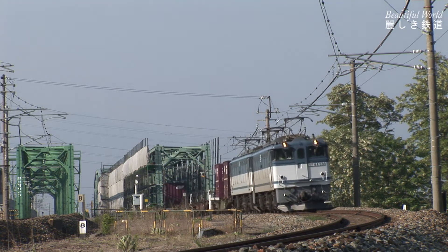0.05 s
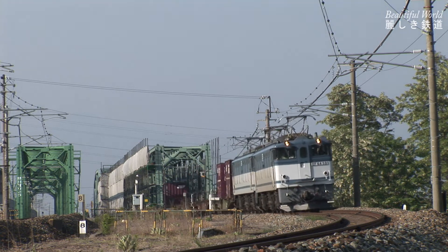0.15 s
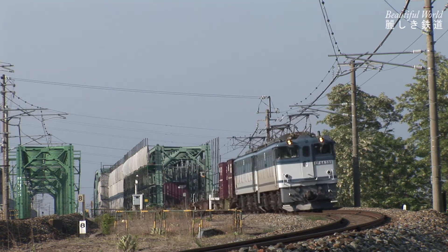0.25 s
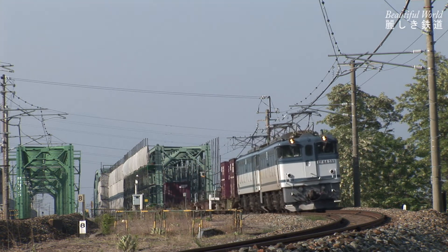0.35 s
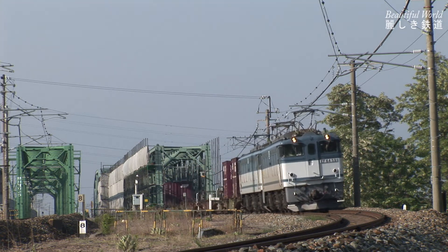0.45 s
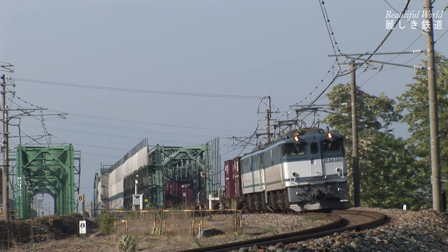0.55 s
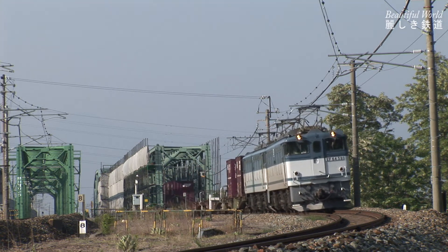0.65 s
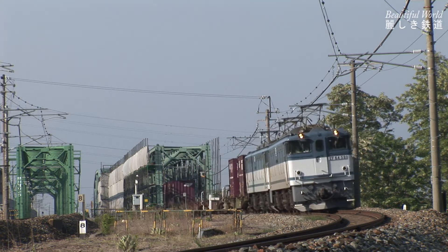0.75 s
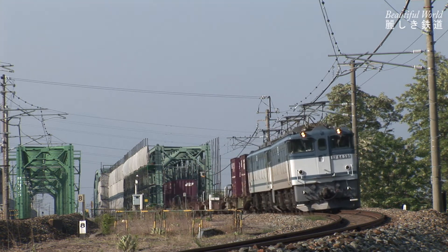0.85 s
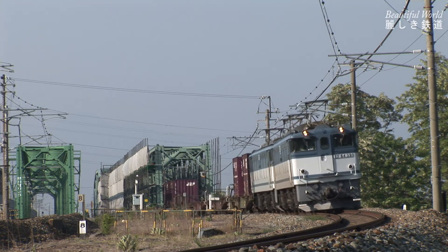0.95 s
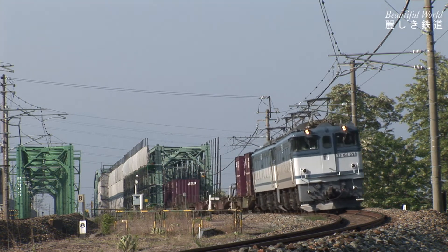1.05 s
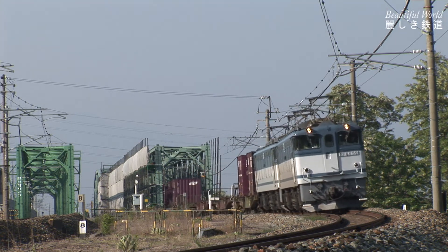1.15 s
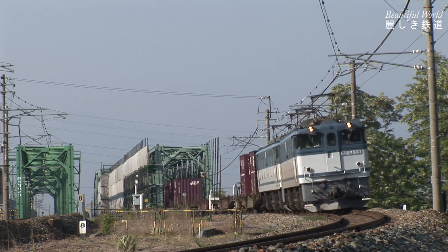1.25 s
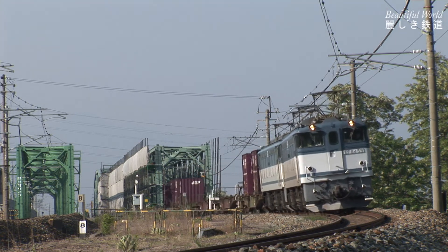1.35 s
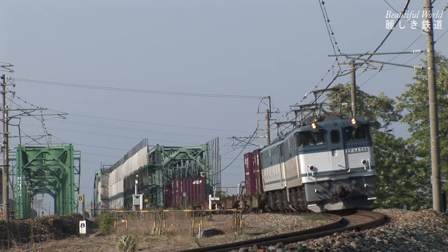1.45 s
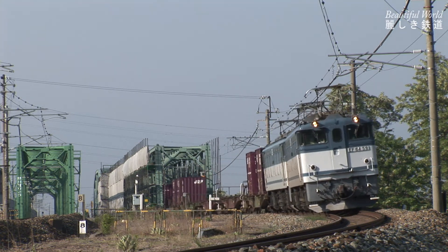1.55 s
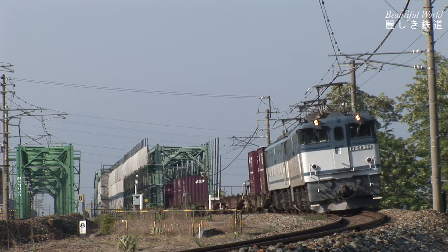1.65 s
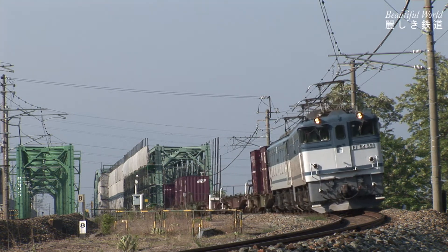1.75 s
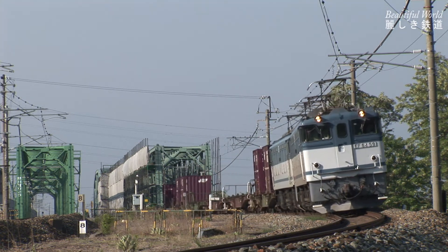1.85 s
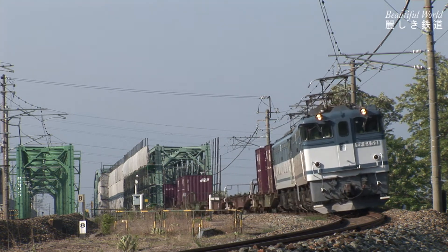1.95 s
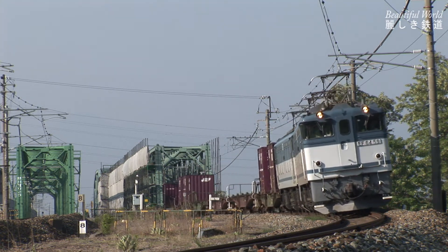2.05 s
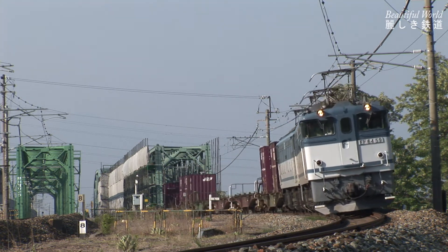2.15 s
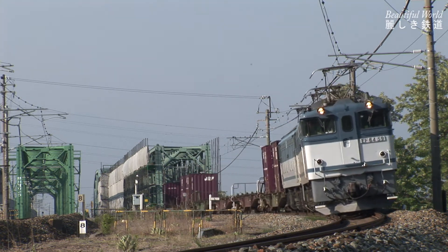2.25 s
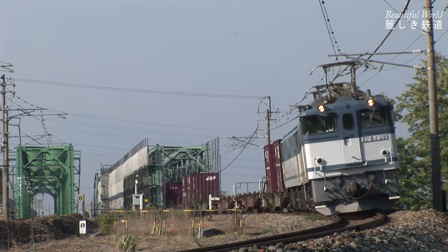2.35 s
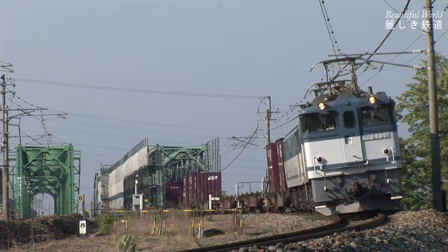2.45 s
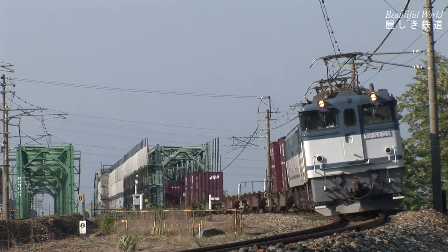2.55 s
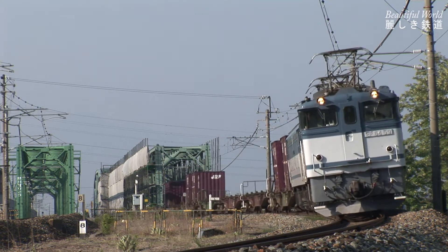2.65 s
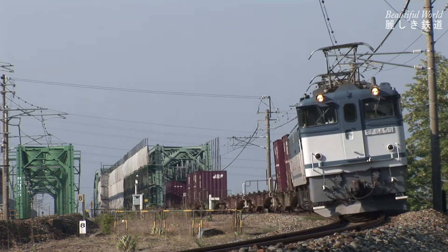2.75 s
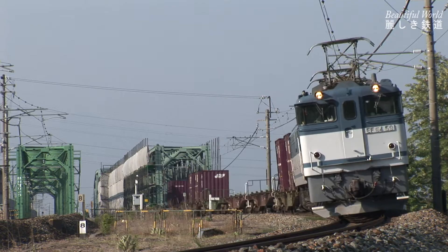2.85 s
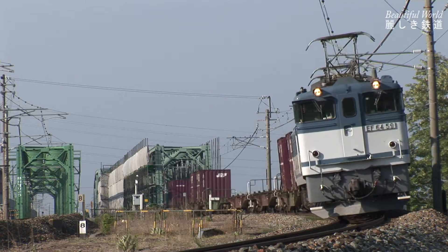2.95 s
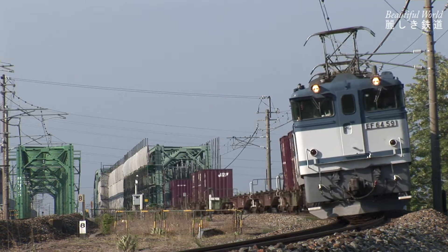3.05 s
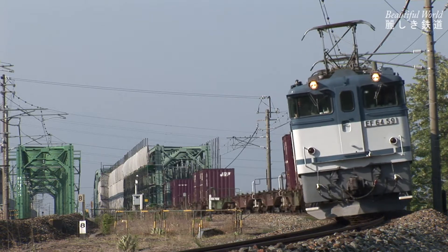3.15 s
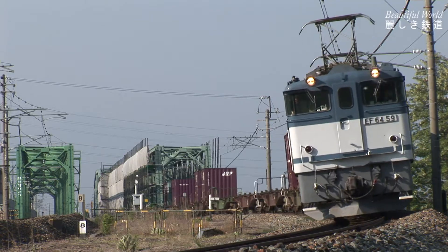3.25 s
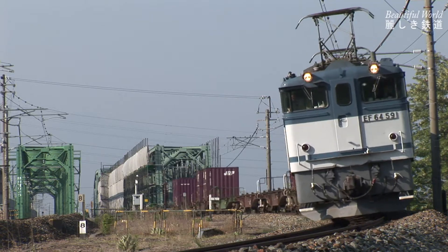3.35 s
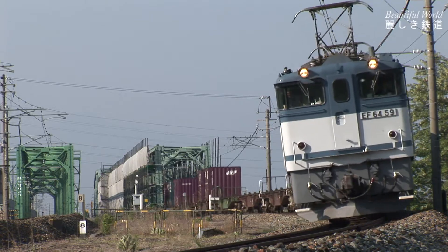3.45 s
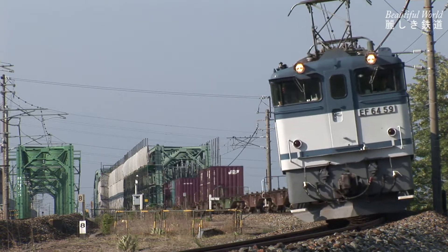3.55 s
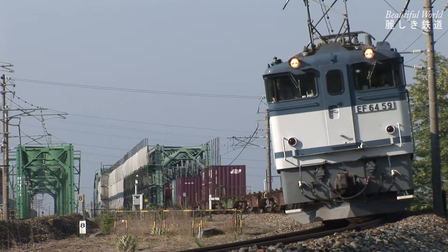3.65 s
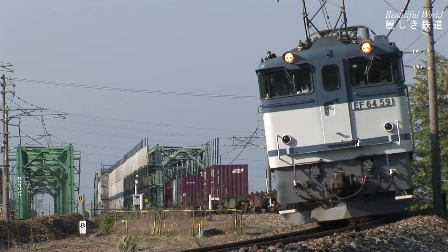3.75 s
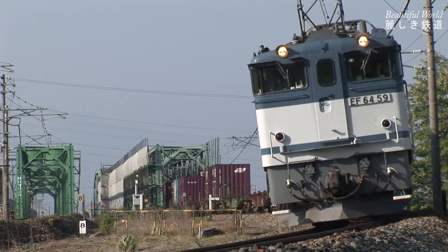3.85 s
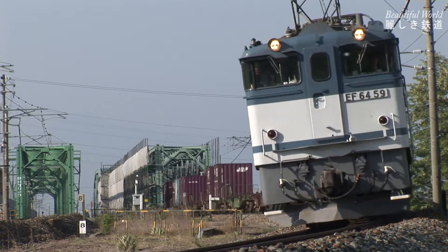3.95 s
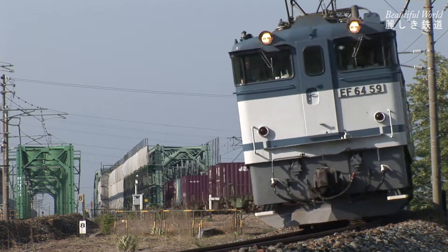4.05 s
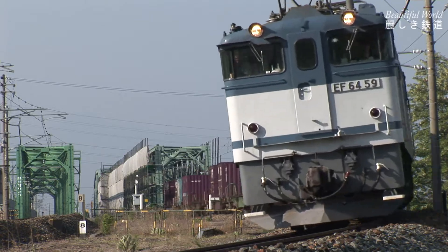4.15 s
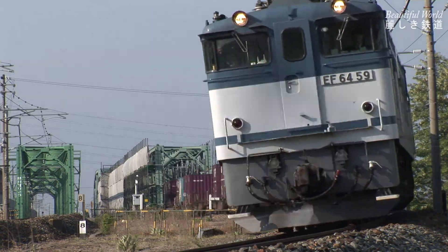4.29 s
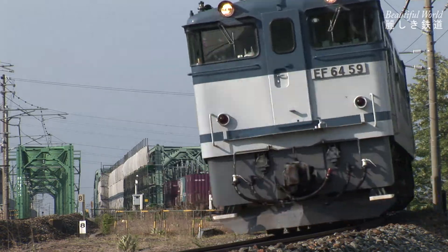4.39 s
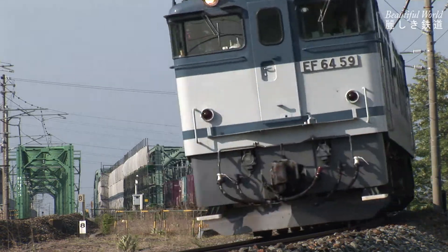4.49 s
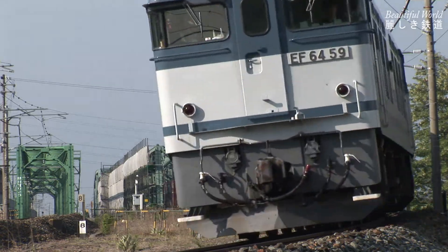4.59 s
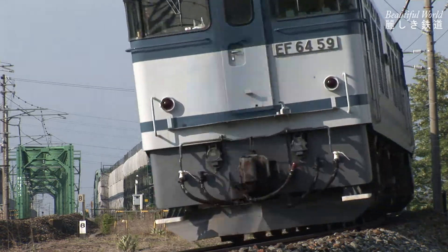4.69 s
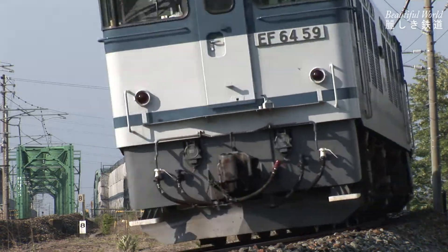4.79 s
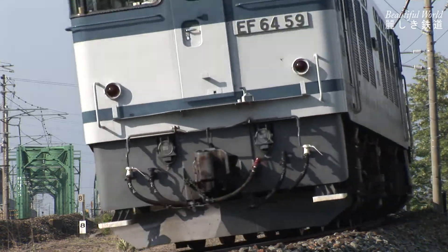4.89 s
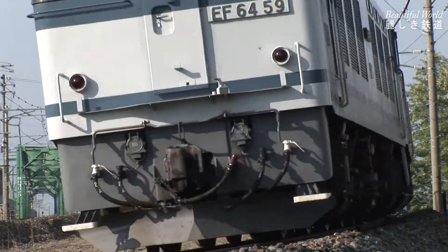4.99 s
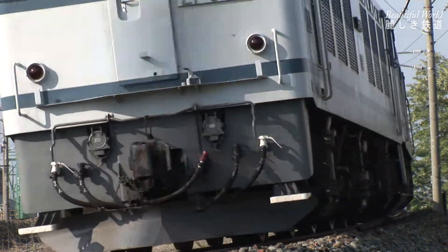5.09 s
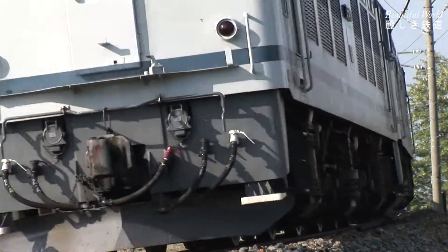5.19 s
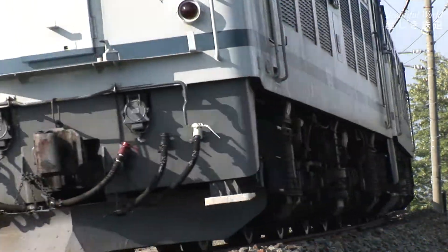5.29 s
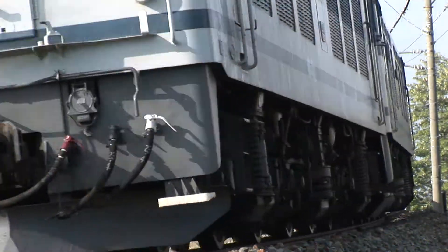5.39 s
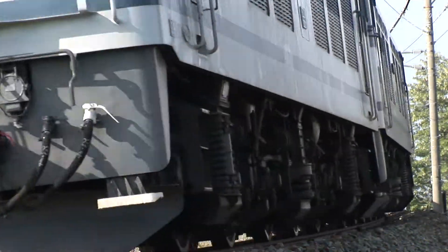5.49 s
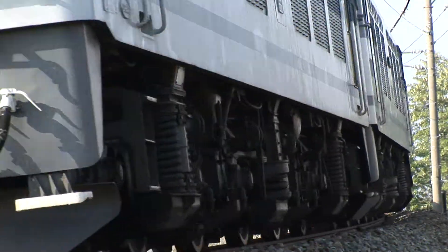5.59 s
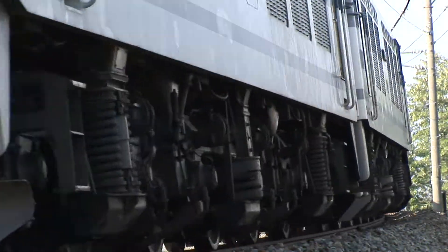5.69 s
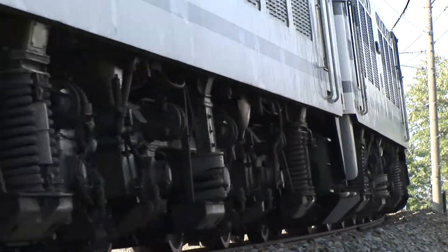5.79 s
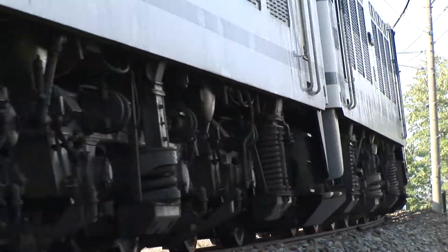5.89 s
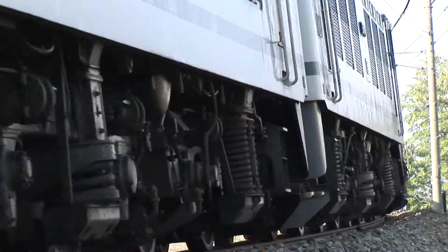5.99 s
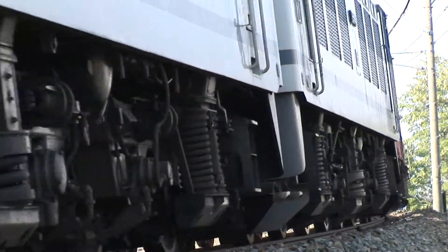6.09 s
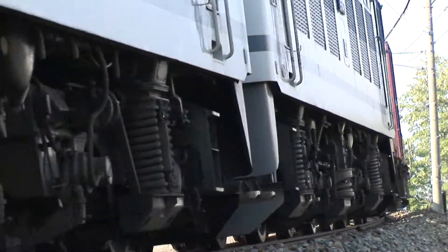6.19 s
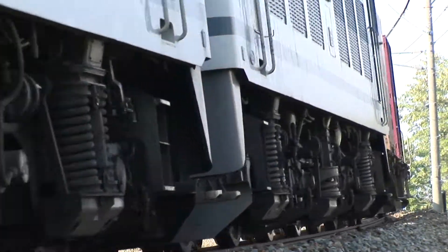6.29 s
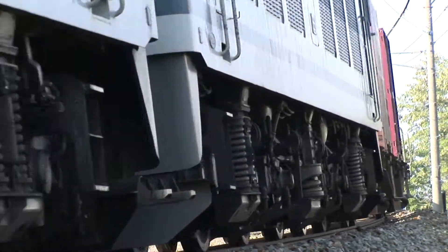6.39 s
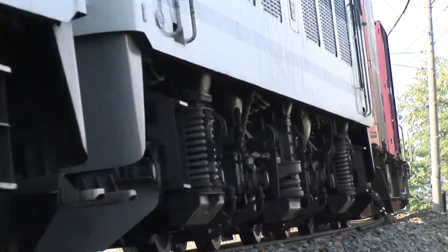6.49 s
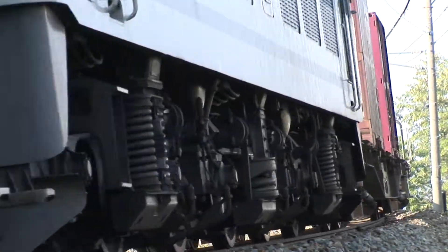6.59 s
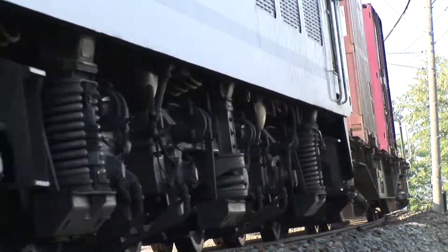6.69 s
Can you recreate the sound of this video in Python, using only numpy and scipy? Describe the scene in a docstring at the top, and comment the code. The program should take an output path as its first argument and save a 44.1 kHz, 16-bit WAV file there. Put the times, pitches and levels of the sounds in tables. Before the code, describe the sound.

Beside a railway curve outdoors, a freight train comes off a steel bridge. A low, soft roar and murmuring girder hum lie under a few short bird chirps. Motor hum and a thin high whine grow as the locomotive nears. Near the end it arrives abruptly: metallic clanks, thuds, booming bodies and bright hiss, very loud, heard in wide stereo from right beside the rails.

```python
"""Freight train coming off a bridge

An electric locomotive pulls freight wagons off a steel bridge and round a curve towards two microphones
beside the track. The far roar, shaped noise, swells slowly over a humming girder and motors; birds chirp as
gliding tones and a thin whine grows. Then wheels clank past as ringing tones with a crack and a thud,
the roar jumps, bodies boom and a bright hiss sets in."""
import sys
import numpy as np
from scipy import signal
from scipy.fft import rfft, irfft, next_fast_len
from scipy.io import wavfile
from scipy.ndimage import uniform_filter1d

SR = 44100
rng = np.random.default_rng(int(sys.argv[2]) if len(sys.argv) > 2 else 0)


def generate_wav(signal):
    """Clip the signal to [-1, 1] and save it as 16-bit WAV at the path in sys.argv[1]."""
    frames = np.transpose(np.atleast_2d(signal))
    scaled = np.clip(frames, -1, 1) * 32767
    pcm = np.round(scaled).astype(np.int16)
    wavfile.write(sys.argv[1], SR, pcm)


N = 296793
T = np.arange(N) / SR  # time in seconds

# the locomotive keeps a steady speed; the near sounds begin before it is abreast
SPEED_M_S, ABREAST_S, TRACK_M = 11.38, 6.528, 2.93
ARRIVE_S = 5.893

# clanks, clicks and trailing rattle of the passing wheels:
# [start_s, ring_level_db, thud_level_db, rattle_change_db]
CLANKS = [(5.889, -21, -25, 2.5), (5.908, -26, -14, 4.5), (5.913, -28, -23, -4.5), (6.04, -24.5, -33, 1.5),
          (6.056, -33, -26, 4), (6.074, -40, -33, 1), (6.094, -41, -22, -6.5), (6.385, -22, -8, 0),
          (6.498, -22.5, -26, -1), (6.56, -29, -23, 2.5)]

# Two-row sounds hold the sum and the difference of the microphones: left = sum + difference,
# right = sum - difference.


def undb(db):
    """Turn decibels into a plain gain."""
    return 10 ** (np.asarray(db) / 20)


def on_log(hz, table, column=1):
    """Read a table column on a logarithmic frequency axis."""
    table = np.array(table, float)
    return np.interp(np.log(hz + 1), np.log(table[:, 0]), table[:, column])


def walk(rate, n):
    """Random levels held for 1 / rate seconds and smoothed twice; spread near 1."""
    hold = int(SR / rate)
    steps = np.repeat(rng.standard_normal(n // hold + 1), hold)
    return 1.62 * uniform_filter1d(uniform_filter1d(steps, hold), hold)[:n]


def rise(start_s, length_s):
    """A ramp from 0 to 1."""
    return np.clip((T - start_s) / length_s, 0, 1)


def level(table):
    """Gain curve of a table of times (s) and levels (dB)."""
    return undb(np.interp(T, *np.transpose(table)))


def bump(center_s, half_s):
    """A smooth bell-shaped swell in time, 1 at its centre."""
    return np.exp(-((T - center_s) / half_s) ** 2)


def distance():
    """Metres to the locomotive on a straight line that passes TRACK_M away."""
    return np.hypot(SPEED_M_S * (ABREAST_S - T), TRACK_M)


def shaped(hz, modes):
    """Gain over frequency of a row of peaks or notches, multiplied together."""
    return np.prod([1 + (undb(db) - 1) / (1 + (2 * (hz - f) / w) ** 2) for f, w, db in modes], axis=0)


def murmur(hz, width_hz):
    """A narrow band of noise around a pitch curve, rms near 1."""
    phase = 2 * np.pi * np.cumsum(hz + 0 * T) / SR
    return walk(width_hz, N) * np.sin(phase) + walk(width_hz, N) * np.cos(phase)


def responses(hz, total, diff, diff_db, link, rings):
    """Gains to sum and difference (rows) from two unrelated noises (columns)."""
    # notches and a ridge in the sum, notches in the difference: [pitch_hz, width_hz, change_db]
    sum_notches = [(4436, 530, -8.5), (4950, 210, 5), (7340, 1550, -13)]
    diff_notches = [(2960, 890, -10.5), (5140, 390, -10), (7100, 440, -14), (10900, 1800, -17)]
    lift = shaped(hz, rings)
    mid = lift * shaped(hz, sum_notches) * undb(on_log(hz, total))
    side = lift * shaped(hz, diff_notches) * undb(on_log(hz, diff) + diff_db)
    share = np.clip(on_log(hz, link), 0, 1)
    turn = np.exp(1j * on_log(hz, link, column=2))
    # the shared part of the difference follows the sum, the rest is its own noise
    return np.array([[mid, 0 * mid], [side * share * turn, side * np.sqrt(1 - share ** 2)]])


def roar(start, gains, colour, swell_db, own_db, grit_db):
    """Noise in bands of about 0.7 octave: parts follow their levels, bands waver, the treble is gritty."""
    # overlapping parts: rumble of bridge and ground, drone of the bodies, rails, wheels, treble hiss
    # [fade_in_from_hz, full_from_hz, full_to_hz, gone_at_hz]
    parts = [(18, 20, 90, 240), (90, 240, 440, 500), (440, 500, 1200, 1600), (1200, 1600, 4200, 7600),
             (4200, 7600, 16800, 17000)]
    length = N - start
    n = next_fast_len(length)
    hz = np.arange(n // 2 + 1) * SR / n
    mix = responses(hz, *colour)
    heard = np.einsum("cif,if->cf", mix, rfft(rng.standard_normal((2, n))))
    weights = [np.interp(hz, part, [0, 1, 1, 0]) for part in parts]
    # even out each part, so that its gain alone sets its level in the sum
    part_rms = [np.sqrt(2 * np.sum(np.abs(w * mix[0, 0]) ** 2) / n) for w in weights]
    gains = [gain[start:] / rms for gain, rms in zip(gains, part_rms)]
    out = np.zeros((2, length))
    swell, grit = walk(5, length), walk(70, length)
    edges = np.geomspace(18, 17000, 15)
    for lo, hi in zip(edges, edges[1:]):
        band = (hz >= lo) & (hz < hi)
        treble = min(lo / 2500, 1.5)  # high bands flicker most
        db = treble * (swell_db * swell + grit_db * grit) + own_db * walk(9, length)
        for weight, gain in zip(weights, gains):
            if weight[band].any():
                out += undb(db) * gain * irfft(heard * band * weight, n)[:, :length]
    return np.pad(out, ((0, 0), (start, 0)))


def far_levels():
    """Steady bridge plus a locomotive that grows as 1 / distance until it arrives; air eats the treble."""
    # rumble, drone, rails, wheels before the swells: wagons on the bridge [level_db],
    # locomotive from ahead [level_db at 1 m]
    bridge_db = [-53, -52.5, -51.5, -58.5]
    ahead_db = [-14.5, -19.5, -21, -15]
    # the far roar swells or dips: [center_s, half_length_s, hiss_change_db, rest_change_db]
    swells = [(2.347, 0.68, 8.5, 0.5), (3.563, 0.25, 10, 1), (3.68, 0.043, 0.5, 2), (4.427, 0.43, 5.5, 1.5),
              (4.797, 0.23, -1, 0.5), (5.1, 0.43, 3.5, 1)]
    hiss_ahead_db, air_loss_db_per_m = -23, 0.51
    metres = distance()
    metres = np.maximum(metres, metres[int(ARRIVE_S * SR)])  # comes no closer after arrival
    hiss_db, rest_db = sum(np.outer(changes, bump(s, half)) for s, half, *changes in swells)
    levels = [np.hypot(undb(bridge), undb(ahead) / metres) * undb(rest_db)
              for bridge, ahead in zip(bridge_db, ahead_db)]
    hiss = undb(hiss_ahead_db - air_loss_db_per_m * metres + hiss_db) / metres
    return levels + [hiss * rise(2.0, 0.25)]


def hum():
    """Three rough partials of the motors; movement towards the listener lifts the pitch."""
    # the three partials, before the load: [level_db at 1 m]
    motor_db = [-28, -28, -34]
    # motor load over time: [time_s, change_db]
    load = [(1.5, -12), (2.65, -8), (2.85, 2), (3.3, -1), (3.9, -5), (4.05, 6), (4.5, 4), (4.7, -6),
            (4.95, -5), (5.1, 1), (5.3, -5), (5.45, 0), (5.6, -4), (5.75, -2), (6.7, -7)]
    motor_hz, width_hz, wander = 293, 55, 0.012  # wander is a share of the pitch
    metres = distance()
    shift = -np.gradient(metres) * SR / 343  # closing speed over the speed of sound
    hz = motor_hz * (1 + shift + wander * walk(3, N))
    out = sum(undb(db) * murmur((k + 1) * hz, width_hz) for k, db in enumerate(motor_db))
    return out * level(load) / metres * np.array([[1], [.3]])


def girder():
    """The bridge steel murmurs on one pitch while wagons cross it, surging now and then, then fades."""
    # surges: [center_s, half_length_s, lift_db]
    surges = [(.12, 0.085, 7), (.82, 0.058, 12.5), (1.12, 0.1, 7.5), (1.95, .15, 6), (2.3, .12, 5),
              (2.93, 0.081, 10)]
    pitch_hz, width_hz, base_db = 335, 40, -60
    db = base_db + sum(lift * bump(s, half) for s, half, lift in surges)
    fade = 1 - rise(2.6, 2.7)
    return undb(db) * fade * murmur(pitch_hz, width_hz) * np.array([[1], [-.25]])


def whine():
    """A thin wavering tone that swells and holds, almost opposite in the two microphones."""
    full_db, full_s, rise_db_per_s = -62, 3.8, 4.5
    db = full_db - rise_db_per_s * np.clip(full_s - T, 0, None)
    phase = 2 * np.pi * np.cumsum(6105 + 8 * walk(60, N)) / SR  # pitch in Hz with a slight waver
    return undb(db + 3 * walk(12, N)) * np.sin(phase) * np.array([[.03], [1]])


def birds():
    """Near-sine glides off to the right: arches bend up and drop again, slides keep climbing."""
    # calls; the pitch is that of the loudest point, call is 0 for an arch and 1 for a slide:
    # [start_s, length_s, pitch_hz, level_db, call]
    chirps = [(.09, .06, 4400, -72, 0), (1.645, .105, 4350, -61, 0), (1.965, .085, 6250, -75, 1),
              (2.39, .082, 4830, -55, 0), (2.655, .085, 4830, -55, 0), (2.9, .085, 6200, -75, 1)]
    # arch and slide: [start_pitch_ratio, end_pitch_ratio, loudest_place_0_to_1, overtone_db]
    call_shapes = [(.85, .93, .82, -28), (.8, 1.15, .2, -14)]
    out = np.zeros(N)
    waver_hz = 25 * walk(150, N)
    for s, length, pitch_hz, db, call in chirps:
        start, end, place, over_db = call_shapes[call]
        span = slice(int(s * SR), int((s + length) * SR))
        u = (T[span] - s) / length  # progress from 0 to 1
        # an arch climbs ever more steeply
        climb = np.clip(u / place, 0, 1) ** (2.2 if call == 0 else 1)
        after = np.clip((u - place) / (1 - place), 0, 1)
        bend = start + (1 - start) * climb + (end - 1) * after
        phase = 2 * np.pi * np.cumsum(pitch_hz * bend + waver_hz[span]) / SR
        loud = np.interp(u, [0, .15, .75 * place, place, .95, 1], [0, .3, .45, 1, .5, 0])
        out[span] += undb(db) * loud * (np.sin(phase) + undb(over_db) * np.sin(2 * phase))
    return out * np.array([[.8], [-1]])


def spits():
    """Gain curve of short spits of hiss: quick rise, exponential fall."""
    # spits: [start_s, level_db]
    spit_times = [(2.171, -59), (2.195, -60), (2.235, -59), (2.245, -63), (2.262, -59), (2.281, -63),
                  (2.312, -55), (2.337, -57), (2.348, -61), (5.89, -33), (5.901, -30), (5.947, -30),
                  (6.0094, -42), (6.0536, -23), (6.177, -36), (6.192, -39), (6.2394, -44), (6.2894, -24),
                  (6.392, -40), (6.455, -43), (6.645, -40)]
    rise_s, t60_s = .005, .07  # t60: time to fall by 60 dB
    out = np.zeros(N)
    for s, db in spit_times:
        span = slice(int(s * SR), int((s + .2) * SR))
        t = T[span] - s
        out[span] += undb(db) * np.clip(t / rise_s, 0, 1) * 1000 ** (-t / t60_s)
    return out


def ring(modes):
    """One set of fading tones, a little different in pitch and level every time."""
    t = T[:SR // 3]
    draw = rng.standard_normal((len(modes), 2))
    push = np.clip(t / 0.00094, 0, 1)  # the tones build up over a moment
    tones = 0
    for (hz, db, t60), (louder, sharper) in zip(modes, draw):
        tone = np.sin(2 * np.pi * hz * (1 + 0.0376 * sharper) * t)
        tones = tones + undb(db + 2 * louder) * tone * 1000 ** (-t / t60)
    return push * tones


def clanks():
    """Clanks and clicks of the passing wheels crack and ring to the left; a thud follows in the middle."""
    # tones of the wheel and of the thud, relative to each clank: [pitch_hz, level_db, t60_s]
    wheel = [(480, -6, .1), (600, -3, .14), (780, -1, .13), (870, -1, .14), (1040, -2, .1), (1200, -3, .08),
             (1400, -3, .06), (1700, -6, .04), (2100, -10, .05), (2500, -10, .06), (3100, -12, .05)]
    thud = [(79, -9, 0.15), (192, -9, 0.14), (275.5, -15.5, 0.23), (518, -15, 0.079)]
    crack_db, crack_t60_s, crack_top_hz, thud_delay_s = 2, 0.026, 3000, 0.0125
    length = SR // 3
    out = np.zeros((2, N + SR))
    fall = undb(crack_db) * 1000 ** (-T[:length] / crack_t60_s)
    dull = signal.butter(4, crack_top_hz, fs=SR, output="sos")
    for s, db, thud_db, _ in CLANKS:
        i, j = int(s * SR), int((s + thud_delay_s) * SR)
        clank = ring(wheel) + fall * signal.sosfilt(dull, rng.standard_normal(length))
        out[:, i:i + length] += undb(db) * clank * np.array([[1], [.6]])
        out[0, j:j + length] += undb(thud_db) * ring(thud)
    return out[:, :N]


def near_levels():
    """Alongside, drone, rails and wheels follow 1 / distance; rattle briefly shifts their level."""
    # drone, rails, wheels from the side, before the rattle: [level_db at 1 m]
    beside_db = [-13, -16, -11]
    # rumble alongside: [time_s, level_db]
    rumble = [(5.92, -36), (6.02, -33), (6.13, -30), (6.22, -34), (6.32, -28), (6.42, -29), (6.5, -25.5),
              (6.72, -45)]
    # bright hiss alongside: [time_s, level_db]
    bright_hiss = [(5.94, -27), (6.03, -28.5), (6.095, -27), (6.11, -31), (6.2, -31.5), (6.24, -26),
                   (6.44, -23), (6.51, -20), (6.55, -21), (6.66, -20), (6.71, -16)]
    rattle_db = sum(change * np.exp(-np.abs(T - s) / 0.054) * (T > s) for s, _, _, change in CLANKS)
    drone, rails, wheels = (undb(db + rattle_db) / distance() for db in beside_db)
    drone = drone * undb(0.5 * (1 - rise(ARRIVE_S, 0.26)))  # starts 0.5 dB louder, then settles
    levels = [gain * rise(ARRIVE_S, 0.018) for gain in (level(rumble), drone, rails, wheels)]
    return levels + [level(bright_hiss) * rise(5.937, 0.0024)]


def booms():
    """The passing bodies boom: low tones that swell and die briefly, slightly unsteady in pitch."""
    # booms, each on its own pitch: [center_s, pitch_hz, half_length_s, level_db]
    boom_times = [(5.93, 80.7, 0.015, -33), (5.933, 276.4, 0.019, -27), (5.963, 192, 0.02, -39),
                  (6.114, 300, 0.014, -24.5), (6.13, 83.7, 0.024, -31), (6.161, 402.6, 0.03, -25.5),
                  (6.232, 410, .03, -27.5), (6.242, 295.4, 0.048, -26.5), (6.308, 75.6, 0.018, -40),
                  (6.357, 369, 0.021, -23), (6.386, 205, 0.02, -22), (6.417, 79.9, .03, -41),
                  (6.435, 212, 0.017, -18), (6.495, 381.6, 0.058, -23.5), (6.504, 199, 0.014, -19.5),
                  (6.546, 244.4, 0.029, -21.5), (6.623, 289.3, 0.019, -23), (6.65, 299.5, 0.018, -22.5),
                  (6.7, 307, 0.016, -24)]
    out = np.zeros(N)
    waver = np.cumsum(.012 * walk(40, N)) / SR
    for (s, hz, half, db), turn in zip(boom_times, rng.random(len(boom_times))):
        tone = np.sin(2 * np.pi * (hz * (T + waver) + turn))
        out += undb(db) * np.sqrt(2) * bump(s, half) * tone
    return out * np.array([[1], [-.2]])


def scene():
    """Far and near roar with the spits, plus all other sources, turned into left and right."""
    # colour of the roar in the sum and in the difference: [pitch_hz, relative_level_db]
    far_sum, far_diff = [(15, -34), (30, -9), (55, 3.5), (110, -4), (236, -13), (439, -13), (1290, -17),
                         (2480, -9), (3900, -16), (5400, -29.5), (6600, -53.5), (9000, -38), (14200, -35.5),
                         (15600, -43)], [(30, -20), (60, -25), (176, -15.5), (287, -10.5), (593, 1),
                                          (900, -2.5), (2250, -2), (3850, -4.5), (6100, -7), (7000, -15.5),
                                          (9100, -18.5), (11500, -20), (14200, -17.5), (15600, -26)]
    near_sum, near_diff = [(15, -42), (33, -17), (55, 2.5), (206, -0.5), (394, -2.5), (460, -9),
                           (1290, -13.5), (1790, -3.5), (3900, -7.5), (5400, -20.5), (6700, -38),
                           (9000, -29.5), (14600, -17.5), (16000, -31)], [(30, -34), (60, -16), (156, -17), (281, -2), (991, -2),
                                             (1310, -5.5), (1780, 0.5), (3850, -3), (5590, -3.5),
                                             (7570, -15), (11000, -11.5), (14900, -9), (16000, -24)]
    # how much of the difference follows the sum: [pitch_hz, share_0_to_1, lead_radians]
    far_link, near_link = [(100, 0.4, 4.5), (400, 0.06, 2), (900, 0.33, 1.5), (1500, 0.1, -0.5),
                           (3000, 0.03, 2), (9000, 0, 4.5), (14000, 0.6, -0.8)], [(100, .5, 3), (350, 0.41, 4.5), (800, 0.56, 0.5),
                                             (1300, 0.69, .5), (2400, 0.98, 1.14), (4460, .1, 2),
                                             (9000, 0.27, 0), (12000, 0.63, 0), (15000, .6, 0.6)]
    # resonances that the roar rings: [pitch_hz, width_hz, change_db]
    far_rings, near_rings = [(311, 200, 7.5), (448, 38, -1.5), (963, 360, 4), (2420, 150, -2),
                             (3130, 810, -2.5)], [(284, 36, 1.6), (430, 40, 4.1), (1790, 48, 1.9),
                                                (2470, 490, 3.5), (2894, 67, 5.6), (3700, 56, 7.1),
                                                (4850, 290, 1.4), (5750, 190, 2.3)]
    far = (far_sum, far_diff, -17.5, far_link, far_rings)  # the number shifts the difference, dB
    near = (near_sum, near_diff, -10, near_link, near_rings)

    bursts = spits()
    arrived = T > ARRIVE_S - .1
    far_gains = far_levels()
    far_gains[-1] = far_gains[-1] + bursts * ~arrived
    # the far spits reach down into the wheel part, 15 dB stronger there
    far_gains[-2] = far_gains[-2] + undb(15) * bursts * ~arrived
    near_gains = near_levels()
    near_gains[-1] = near_gains[-1] + bursts

    train = roar(0, far_gains, far, swell_db=.25, own_db=.65, grit_db=.4)
    train += roar(np.argmax(arrived), near_gains, near, swell_db=.6, own_db=.7, grit_db=1.2)
    mid, side = train + hum() + girder() + booms() + clanks() + birds() + whine()
    return np.array([mid + side, mid - side])


def record(dry):
    """Add a faint separate hiss in each channel, softened at the top; round loud peaks and cut the top."""
    hiss_db, hiss_top_hz, ceiling, top_hz = -73, 13300, 1.05, 15900  # hiss level before its low-pass
    soft = signal.butter(6, hiss_top_hz, fs=SR, output="sos")
    hiss = signal.sosfilt(soft, rng.standard_normal(dry.shape))
    rounded = ceiling * np.tanh((dry + undb(hiss_db) * hiss) / ceiling)
    return signal.sosfilt(signal.ellip(10, .2, 80, top_hz, fs=SR, output="sos"), rounded)


dry = scene()
out = record(dry)
generate_wav(out)
```